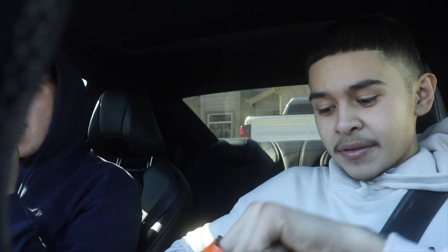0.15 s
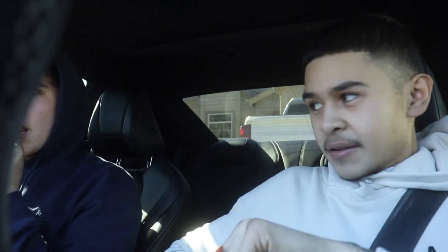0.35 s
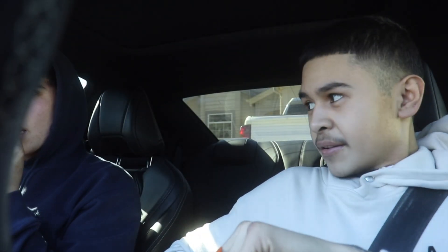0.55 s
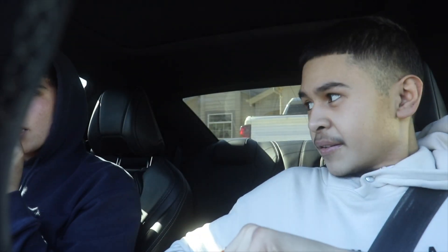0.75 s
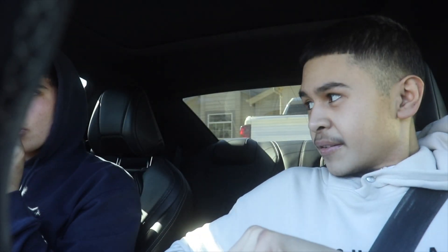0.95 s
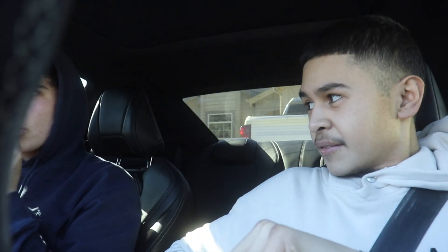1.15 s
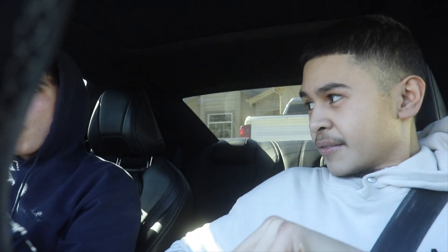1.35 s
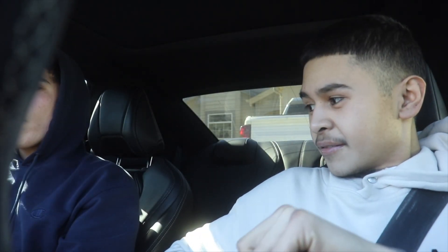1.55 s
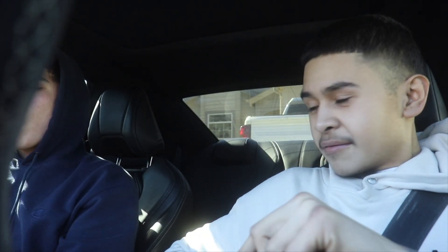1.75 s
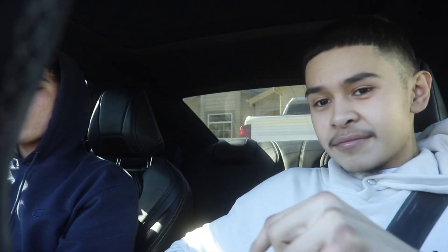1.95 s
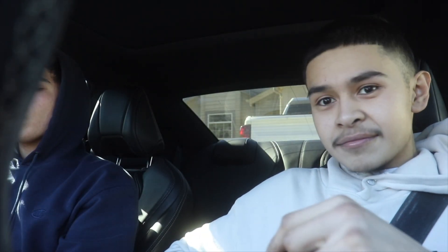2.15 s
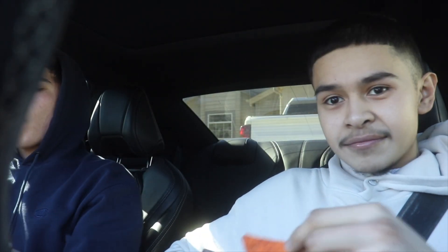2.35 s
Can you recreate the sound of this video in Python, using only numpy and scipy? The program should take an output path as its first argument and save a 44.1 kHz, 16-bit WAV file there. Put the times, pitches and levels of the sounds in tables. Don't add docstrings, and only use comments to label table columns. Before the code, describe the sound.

Snack bag crinkling: crisp snaps, rustles and soft finger thumps, close up in a parked car

```python
import sys
import numpy as np
from scipy import signal
from scipy.fft import rfft, irfft
from scipy.io import wavfile
from scipy.ndimage import uniform_filter1d, map_coordinates

SR = 44100
rng = np.random.default_rng(int(sys.argv[2]) if len(sys.argv) > 2 else 0)


def dump_mix(stems):
    frames = np.atleast_2d(stems).T
    limited = np.clip(frames, -1, 1)
    pcm = np.round(limited * 32767).astype(np.int16)
    wavfile.write(sys.argv[1], SR, pcm)


def ratio(d):
    e = np.asarray(d, float) / 20
    return 10 ** e


N = 105840
CRACKLES_PER_S, CRACKLE_SPREAD_DB, CRACKLE_CAP = 3500, 3, 0.97


def unit(x):
    return x / np.sqrt(np.mean(x ** 2) + 1e-20)


def along(points, hz):
    f, v = np.transpose(points)
    return np.interp(np.log(hz + 1), np.log(f + 1), v)


def coloured(x, spectrum):
    gain = ratio(along(spectrum, np.fft.rfftfreq(N, 1 / SR)))
    return unit(irfft(rfft(x) * gain, N))


def wobble(rate_hz):
    knots = rng.standard_normal(int(N * rate_hz / SR) + 4)
    return map_coordinates(knots, [np.arange(N) * rate_hz / SR])


def placed(rows, start_s):
    at = np.round(start_s * SR).astype(int)[:, None] + np.arange(rows.shape[1])
    return np.bincount(at.ravel(), rows.ravel(), N + rows.shape[1] + SR)[:N]


def floor():
    # (frequency [Hz], density [dB per Hz])
    floor_spectrum = [(13, -43), (22, -7.5), (74, -8.5), (169, -7), (256, -14.5), (432, -17), (539, -21.5),
                      (4500, -38.5), (16000, -38.5)]
    level_db = -47.5 + wobble(7.8)
    return ratio(level_db) * coloured(rng.standard_normal(N), floor_spectrum)


def crackle_sizes(draw):
    return ratio(-CRACKLE_SPREAD_DB * np.log(1 - CRACKLE_CAP * draw))


def crackles():
    # (frequency [Hz], density [dB per Hz])
    film_spectrum = [(450, -4.5), (1500, 0), (2600, -3), (3800, -2.5), (5300, -1.8), (6700, -11.5),
                     (10400, -18), (17600, -120)]
    slide, patch_db = 0.5, 3
    draw = rng.random((int(CRACKLES_PER_S * N / SR), 3))
    sign = np.sign(draw[:, 2:] - 0.5)
    ticks = placed(crackle_sizes(draw[:, 1:2]) * sign, draw[:, 0] * N / SR)
    z = signal.stft(unit(ticks) + slide * rng.standard_normal(N), nperseg=256)[2]
    panels = uniform_filter1d(rng.standard_normal(z.shape), size=3, axis=0)
    panels = uniform_filter1d(panels, size=6, axis=1)
    patchy = signal.istft(z * ratio(patch_db * unit(panels)), nperseg=256)[1][:N]
    return coloured(patchy, film_spectrum)


def grains(per_s, hz, octaves, size):
    cycles, rise_cycles = 4.3, 0.86
    draw = rng.random((int(per_s * N / SR), 4))
    spread = draw[:, 1:2] + draw[:, 2:3] - 1
    pitch_hz = np.clip(hz * 2 ** (octaves * spread * 2.3), 60, SR * 0.4)
    u = pitch_hz * np.arange(size) / SR
    envelope = ratio(-60 * u / (2.43 * cycles)) * (1 - np.exp(-u / rise_cycles))
    rows = crackle_sizes(draw[:, 3:]) * envelope * np.sin(2 * np.pi * u)
    return unit(placed(rows, draw[:, 0] * N / SR))


def rustle():
    # (time [s], handling level [dB], brightness [dB], weight [dB])
    handling = [(0, -51, -3, 15), (0.178, -51.5, -5, -4), (0.217, -40, 5.5, 3), (.38, -43, 7, 0),
                (.58, -48, -27, 9), (.71, -55.5, -34, 9), (0.861, -43.5, 3, 2.5), (1.0, -45.5, -12, -2),
                (1.06, -34.5, 6, 1.5), (1.22, -38.5, -4, 1.5), (1.286, -45.5, -8, 4.5), (1.477, -38, 0, 3),
                (1.66, -36.5, -2, -1), (1.699, -47.5, 13.5, -2), (1.76, -40.5, 7.5, -6.5),
                (2.174, -41.5, -9, 6.5), (2.242, -68, -13, -15), (2.4, -47.5, -2, 12)]
    crackle_db, clump_db, fizz_db, shift_db = 1, 3, -12, -7.5
    s, *cols = np.transpose(handling)
    level_db, bright_db, weight_db = [np.interp(np.arange(N) / SR, s, c) for c in cols]
    shared_db = level_db + crackle_db + clump_db * wobble(60)
    fizz = grains(CRACKLES_PER_S, hz=9100, octaves=0.54, size=150)
    shift = grains(CRACKLES_PER_S / 5, hz=352.4, octaves=0.43, size=2000)
    low = ratio(shift_db + weight_db) * shift
    high = ratio(fizz_db + bright_db) * fizz
    return ratio(shared_db) * (crackles() + high + low)


def thumps():
    # (time [s], peak level [dB], frequency [Hz])
    finger_thumps = [(0.135, -25.5, 330), (0.137, -26.5, 171), (0.395, -26.5, 316), (0.537, -25, 350),
                     (0.394, -29, 166), (0.536, -27.5, 167), (0.684, -29, 236), (0.803, -20, 490),
                     (1.139, -25.5, 456), (1.198, -30, 300), (1.249, -26.5, 350), (1.394, -21.5, 382),
                     (1.482, -23, 290), (1.495, -24, 320), (1.618, -23, 357), (1.736, -30, 410),
                     (1.809, -27.5, 465), (1.995, -29, 269), (2.049, -22.5, 630), (2.066, -21.5, 222),
                     (2.097, -18.5, 206)]
    gain_db, lag_s, cycles, rise_cycles = 0.5, 0.0031, 1.97, 0.36
    s, db, hz = np.transpose(finger_thumps)[:, :, None]
    u = hz * np.arange(2500) / SR
    decay = ratio(db + gain_db - 60 * u / (3.44 * cycles))
    rows = 2 * decay * np.sin(2 * np.pi * u) * (1 - np.exp(-u / rise_cycles))
    return placed(rows, s[:, 0] + lag_s)


def resonate(rows, hz, q, edge_hz=490000.0):
    edge_damp = 1
    f = np.fft.rfftfreq(rows.shape[1], 1 / SR)
    edge = 1 - (f / edge_hz) ** 2 + 1j * edge_damp * f / edge_hz
    loss = 1j * f * hz / q
    response = loss / (hz * hz - f * f + loss) / edge
    out = irfft(rfft(rows) * response ** 2, rows.shape[1])
    return out / np.abs(out).max(axis=1, keepdims=True)


def snaps():
    # (time [s], peak level [dB], panel ring [Hz], thin-
    # film sizzle [dB], bag-body knock [dB])
    crease_snaps = [(0.1999, -34, 2320, 3.5, -1), (0.212, -25, 4600, -10, -8),
                    (0.2202, -11.5, 4770, -11.5, -12), (0.236, -13, 2700, -4, -10.5),
                    (0.2474, -9, 5300, -4, -29), (0.2649, 7, 4860, -20, -17), (0.2823, -22, 3370, -29, -24),
                    (0.3008, -25, 1340, -10, -21), (0.3982, -21, 4300, -19, -10),
                    (0.411, -19.5, 3520, -10, -10.5), (0.4282, -18.5, 3270, -25, -22.5),
                    (0.441, -7.5, 3820, -1.5, -21.5), (0.4525, -20.5, 2720, -28, 3.5),
                    (0.4705, -14, 3570, -5, -21), (0.4964, 7, 4810, -13, -19.5),
                    (0.5372, -16.5, 2060, -15, -12), (0.6461, -32.5, 3500, -8, 6),
                    (0.6832, -11.5, 4900, -7.5, -15),
                    (0.807, -17.5, 1510, -39, -13), (0.847, -17.5, 944, -7, -30),
                     (0.8773, -9, 5340, -5, -32), (0.9088, -23, 5300, 0, -8), (0.9372, 1.5, 7830, 5, -23.5),
                     (0.9417, -5.5, 5060, -38, -17), (0.9601, -7.5, 5800, 2.5, -45),
                     (1.0208, -16.5, 4700, 4.5, -18), (1.0304, -3.5, 4560, -48, -43),
                     (1.037, -19, 4700, 6, -8.5), (1.042, -1.5, 4600, -4, -42), (1.0618, -20, 2500, -26, 4),
                     (1.0788, -11.5, 4460, -36, -10.5), (1.0926, -9, 4100, -4, -9),
                     (1.107, -21, 2950, -25, -1), (1.1223, -24, 2680, -36, -41),
                     (1.1432, -15, 4600, -6.5, -3), (1.2312, -23.5, 1390, -3.5, 1),
                     (1.74, -8.5, 2600, -17, -16.5), (1.8114, -15, 4540, -32, -12),
                    (1.3797, -21.5, 2170, -6, -5), (1.4017, 5, 4670, -11, -15), (1.462, -17.5, 1860, -18, -7),
                  (1.488, -19, 5100, -17, 1), (1.4987, -16, 4300, -8.5, -2),
                  (1.5997, -13.5, 2300, -12, -7.5), (1.667, -18, 4400, 3.5, -27),
                  (1.7772, -33, 4200, -20, 9), (1.815, -11, 4460, -16, -9), (1.898, -29, 2310, -29, 4.5),
                  (1.9213, -27, 5350, 3.5, -27), (1.9704, -19, 8300, -7, -26),
                  (1.9807, -0.5, 8960, -24, -35), (1.9864, -3, 8500, -8, -33), (2.004, -17, 8500, 7, -20),
                  (2.009, -26.5, 8060, 10, -32), (2.0268, -28, 8200, 7, -25), (2.0463, -9.5, 8240, -5, -39),
                  (2.064, -20, 4700, -26, -25), (2.0787, -25, 2930, -29, -22),
                  (2.088, -26.5, 2730, -31, -14), (2.0993, -17.5, 2620, -20, -26),
                    (0.2176, -17, 5000, -12, -16), (0.2245, -22, 3460, -8, -30),
                   (0.3075, -38, 1500, -30, -19), (0.4725, -24, 6450, 0, -30), (0.525, -31, 3000, -22, -14),
                   (0.554, -46, 3020, -20, -8), (0.5846, -36, 2470, -15, -5),
                   (0.6887, -26.5, 5600, -1, -37), (0.7372, -36.5, 6850, -2, -0.5),
                   (0.8008, -42, 4100, -7, 4), (0.8397, -19, 4970, -18, -15), (0.856, -19, 4500, -17, -19),
                   (0.921, -21.5, 8000, 4, -30), (1.013, -29, 5000, -5, -30), (1.0444, 2, 7040, -33, -21),
                   (1.068, -17, 7500, -7, -33), (1.115, -25, 3480, -30, -9), (1.191, -28, 4000, -4, -4),
                   (1.3215, -31, 1130, -8, -2), (1.387, -21, 4500, -8, -1), (1.434, -25.5, 1410, -12, -19),
                   (1.455, -23.5, 4740, -12, -2), (1.485, -20, 5530, -10, -2),
                   (1.503, -22, 5240, -17, -1.5), (1.509, -23.5, 2160, -17, -3),
                   (1.529, -27, 1400, -15, -23), (1.5585, -29, 3300, -13, -29),
                   (1.5868, -18.5, 4250, -15, -6), (1.7293, -24, 3200, -25, -2),
                   (1.7486, -22.5, 2530, -30, -30), (1.8132, -6, 3270, -5, -16),
                   (1.8448, -32, 3120, -21, 0), (1.934, -16, 7900, -15, -32), (1.976, -19, 8400, 4, -34),
                   (1.997, -15, 10000, -19, -19), (2.04, -39, 4300, -20, -30),
                   (2.1667, -27, 2630, -10, -25), (2.2264, -42.5, 3000, -12, -12)]
    slip_t60_s, first_slip, sharpen = 0.017, 16, 0.72
    ring_db, film_db, sizzle_gain_db, knock_gain_db = -4.5, -3, 2.5, 4.5
    ring_width_hz, film_hz, film_width_hz, film_pull = 1700, 4700, 4300, 0.25
    table = np.array(crease_snaps)
    s, db, hz, sizzle_db, knock_db = table.T[:, :, None]

    t = np.arange(2048) / SR
    draw = rng.standard_normal((len(s), 2048))
    slips = draw * np.abs(draw) * ratio(-60 * t / slip_t60_s) * (t < 0.03)
    slips = slips + first_slip * ratio(sharpen * db) * (t == 0)
    slips = np.pad(slips, [(0, 0), (52, 0)])[:, :2048]

    edge_hz = np.maximum(np.minimum(2.3 * hz, 6500), 1.3 * hz)
    pulled_hz = film_hz * (hz / film_hz) ** (1 - film_pull)
    film_q = (hz + film_hz) / 2 / film_width_hz
    panel = resonate(slips, hz, 1 + hz / ring_width_hz)
    film = resonate(slips, pulled_hz, film_q, edge_hz)
    sizzle = resonate(slips, hz=9100, q=0.55)
    knock = resonate(slips, 1435, 0.57, edge_hz)
    sound = ratio(ring_db) * panel + ratio(film_db) * film
    sound += ratio(sizzle_db + sizzle_gain_db) * sizzle
    sound -= ratio(knock_db + knock_gain_db) * knock
    return placed(ratio(db) * sound, s[:, 0])


def singing():
    # (time [s], level [dB], frequency [Hz])
    taut_panels = [(.943, -30, 880), (.961, -31, 860), (.943, -19, 5250), (.961, -20, 5500),
                   (.878, -24, 5300), (.91, -30, 5300), (1.982, -28, 3300), (2.005, -24, 3320),
                   (2.029, -28, 3290), (1.986, -33, 1250), (1.998, -31, 1200), (2.048, -25, 640),
                   (.847, -31, 1050), (2.099, -26, 470)]
    t60_s, rise_s = 0.05, 0.0015
    s, db, hz = np.transpose(taut_panels)[:, :, None]
    t = np.arange(3000) / SR
    envelope = ratio(db - 60 * t / t60_s) * (1 - np.exp(-t / rise_s))
    return placed(envelope * np.sin(2 * np.pi * hz * t), s[:, 0]) * ratio(5 * wobble(200))


def cabin(x):
    # (frequency [Hz], t60 [s])
    cabin_t60 = [(200, 0.09), (2000, 0.08), (6000, 0.017), (14000, 0.056)]
    gap = int(0.002 * SR)
    out, step = np.zeros(N + SR), SR // 12
    for start in range(0, N, step):
        hz, t, z = signal.stft(rng.standard_normal(SR // 5), SR, nperseg=128)
        decay = ratio(-60 * t / along(cabin_t60, hz)[:, None])
        tail = signal.istft(z * decay, SR, nperseg=128)[1]
        wet = signal.fftconvolve(x[start:start + step], tail / np.linalg.norm(tail))
        out[start + gap:][:len(wet)] += wet
    return out[:N]


def scene():
    cabin_db = -11.5
    bag = snaps() + thumps() + singing() + rustle()
    return (bag + ratio(cabin_db) * cabin(bag) + floor())[None]


def low_pass(x):
    return signal.sosfilt(signal.butter(12, 16650, fs=SR, output="sos"), x)


def record(dry):
    ceiling, hardness, top_hz = 0.92, 8, 15360
    x = dry / (1 + np.abs(dry / ceiling) ** hardness) ** (1 / hardness)
    f = np.fft.rfftfreq(N, 1 / SR)
    x = irfft(rfft(x) / (1 + (f / top_hz) ** 80), N)
    return low_pass(x)


dry = scene()
out = record(dry)
dump_mix(out)
```